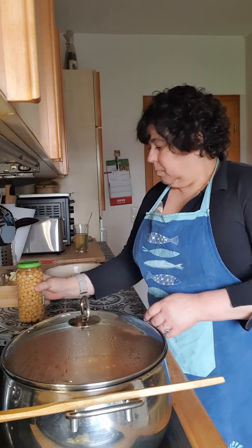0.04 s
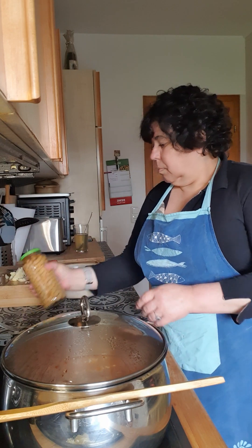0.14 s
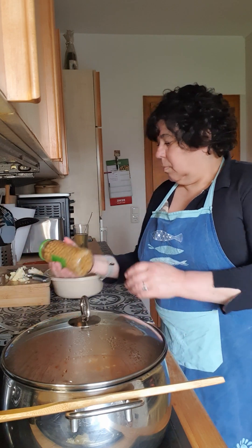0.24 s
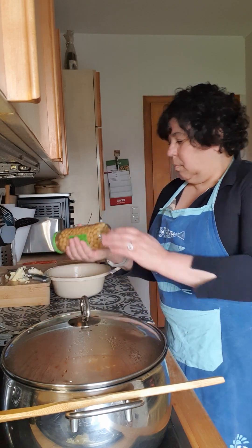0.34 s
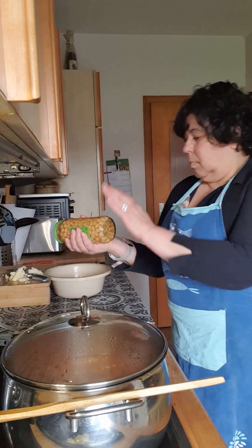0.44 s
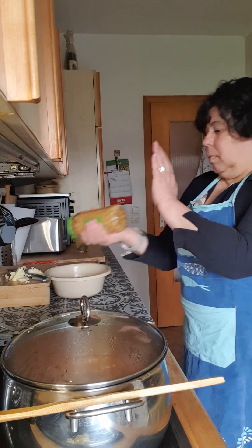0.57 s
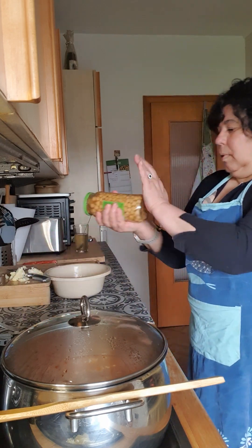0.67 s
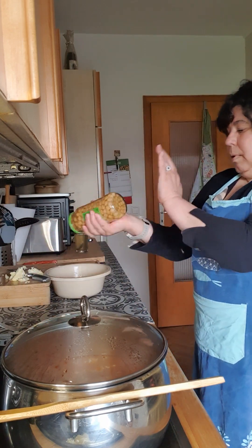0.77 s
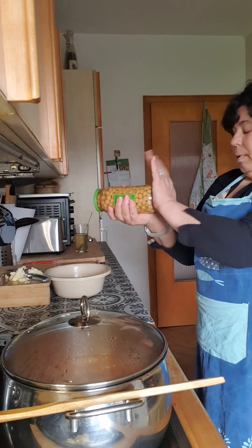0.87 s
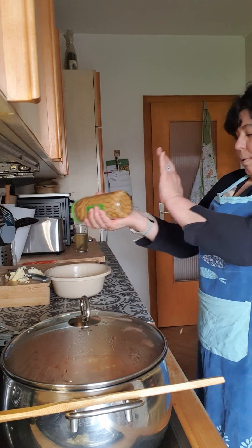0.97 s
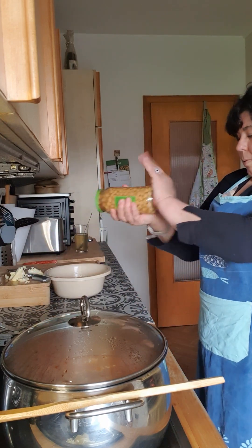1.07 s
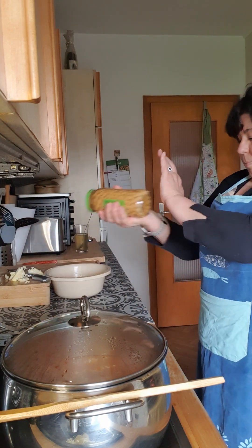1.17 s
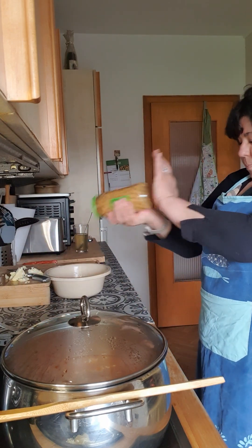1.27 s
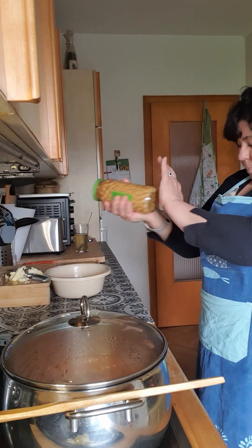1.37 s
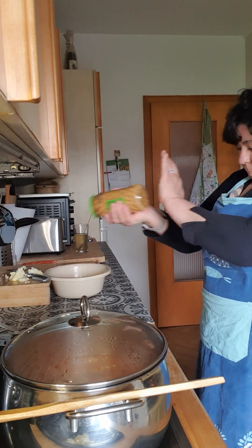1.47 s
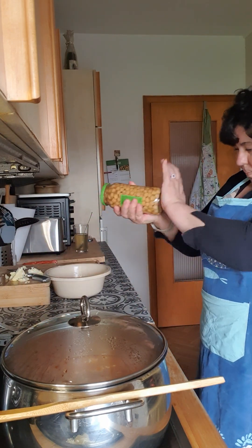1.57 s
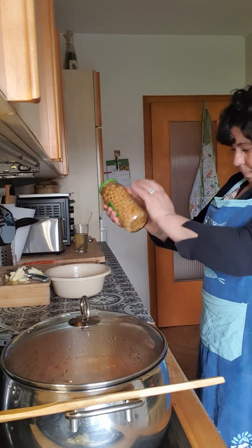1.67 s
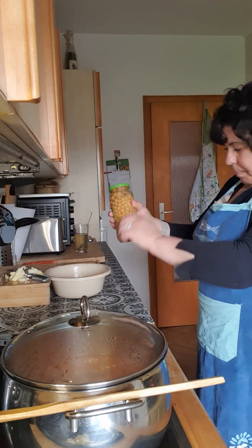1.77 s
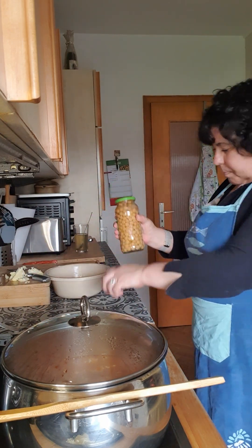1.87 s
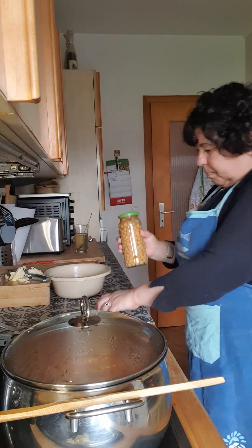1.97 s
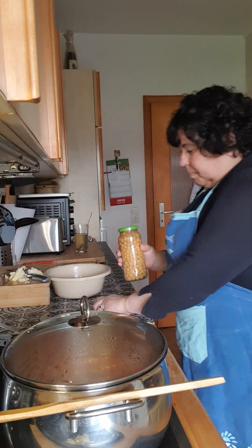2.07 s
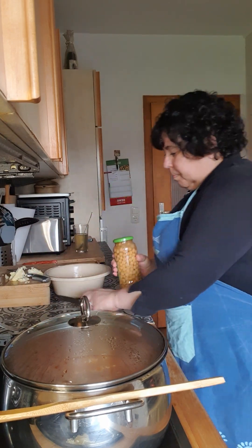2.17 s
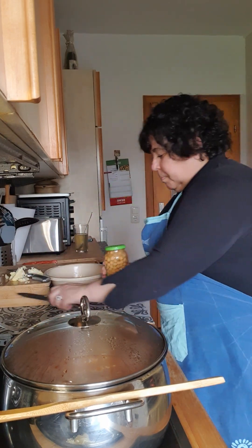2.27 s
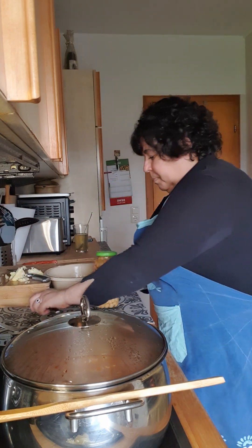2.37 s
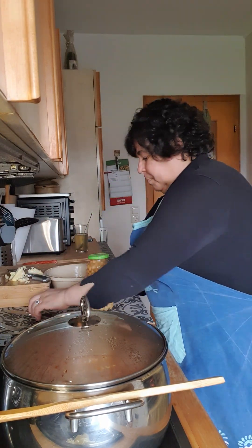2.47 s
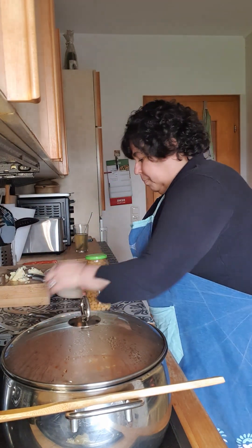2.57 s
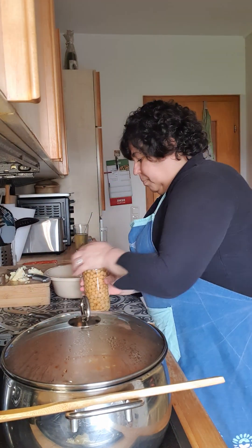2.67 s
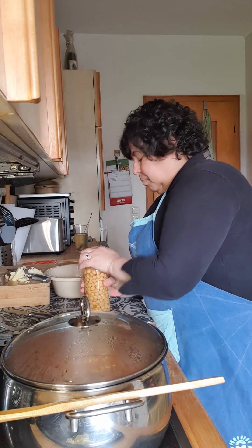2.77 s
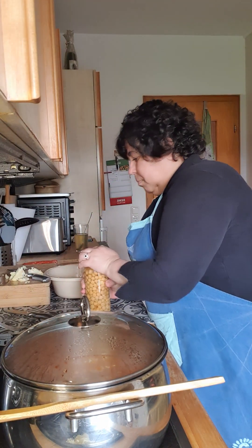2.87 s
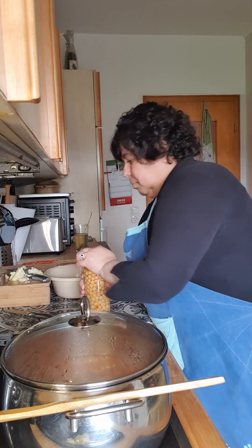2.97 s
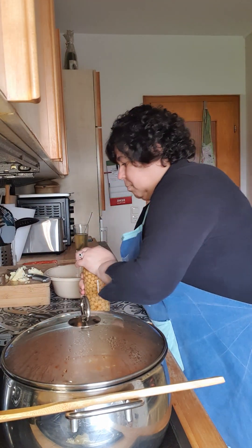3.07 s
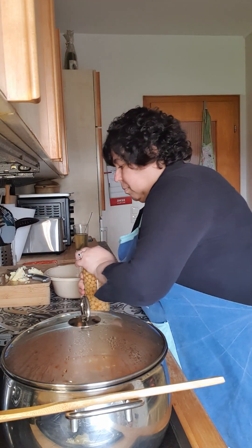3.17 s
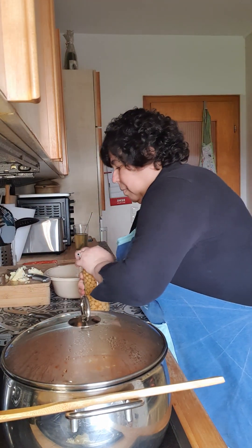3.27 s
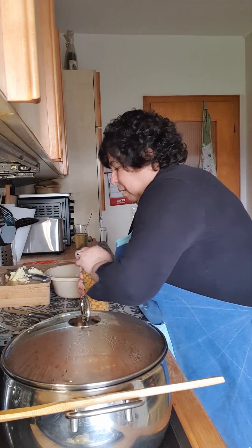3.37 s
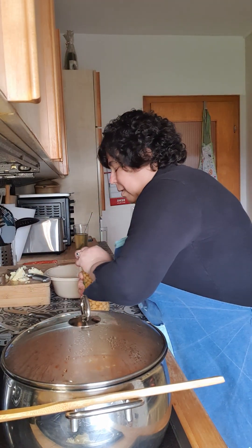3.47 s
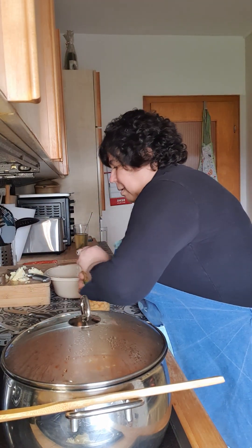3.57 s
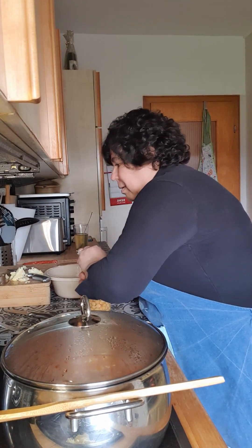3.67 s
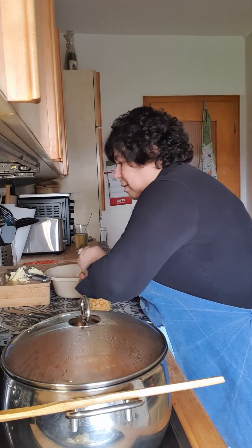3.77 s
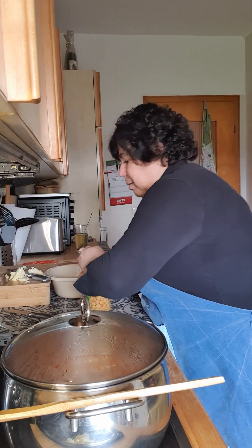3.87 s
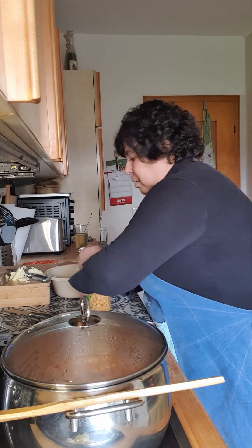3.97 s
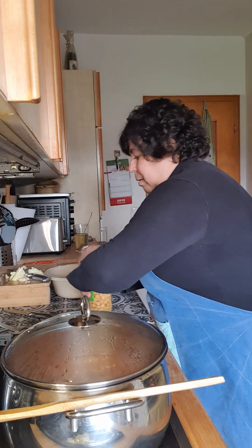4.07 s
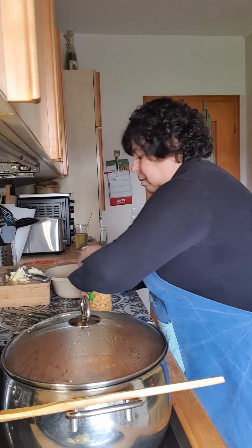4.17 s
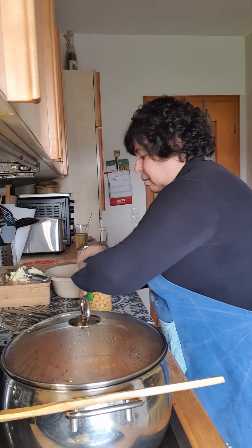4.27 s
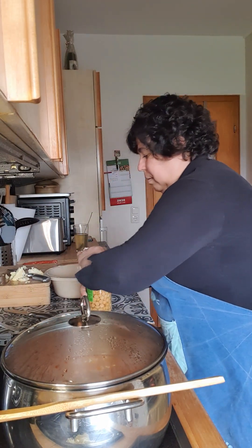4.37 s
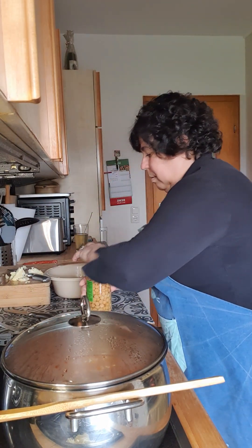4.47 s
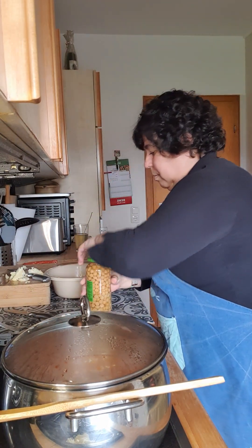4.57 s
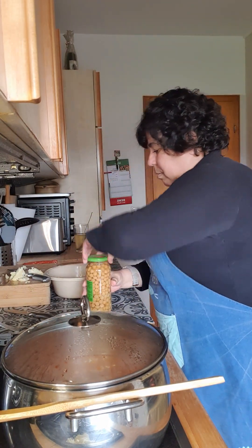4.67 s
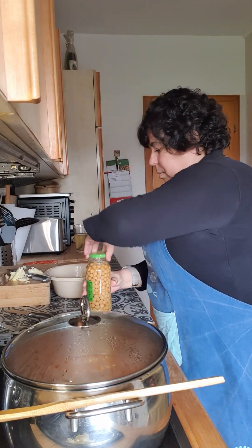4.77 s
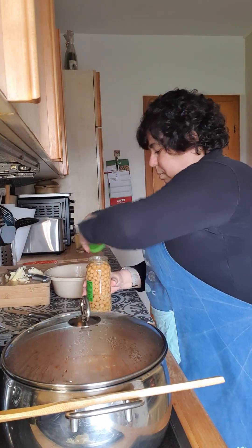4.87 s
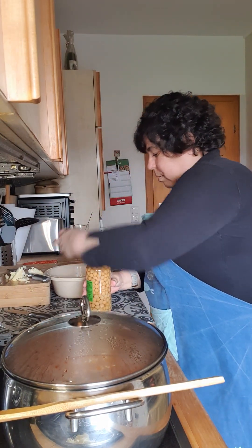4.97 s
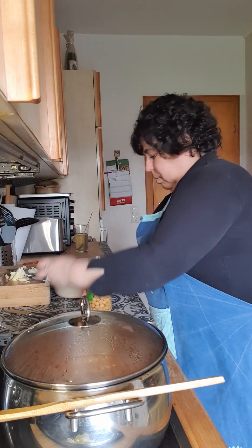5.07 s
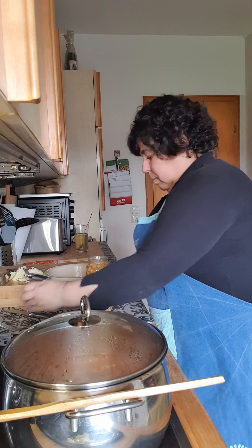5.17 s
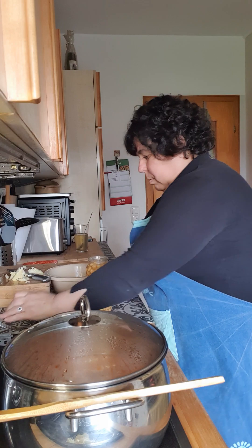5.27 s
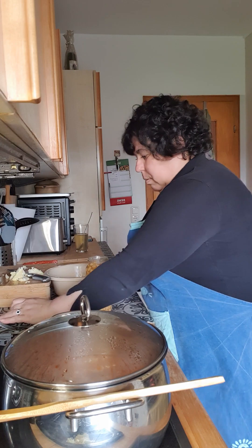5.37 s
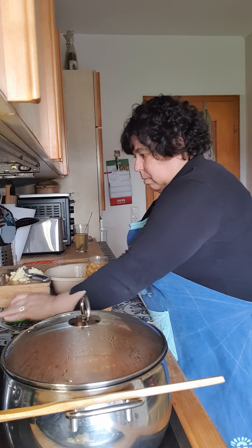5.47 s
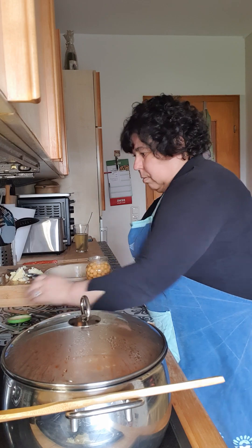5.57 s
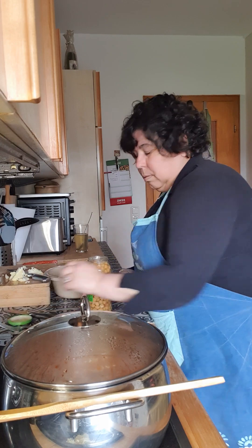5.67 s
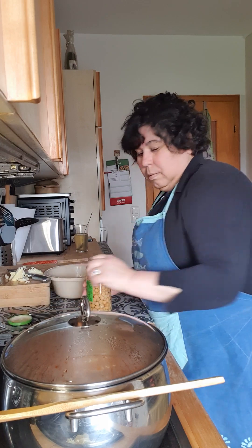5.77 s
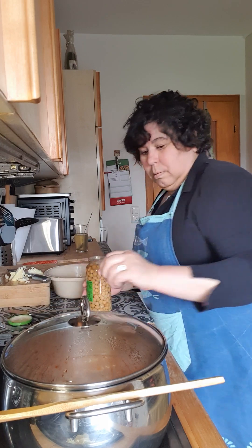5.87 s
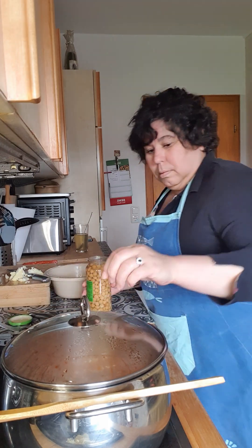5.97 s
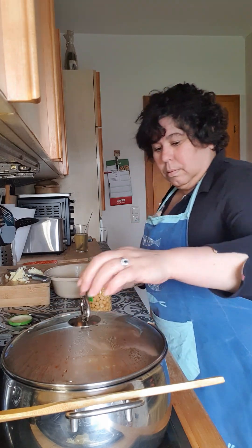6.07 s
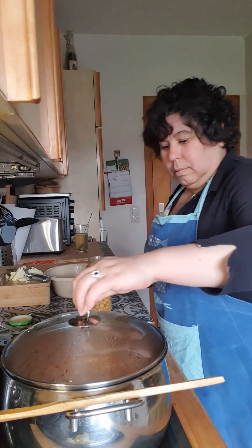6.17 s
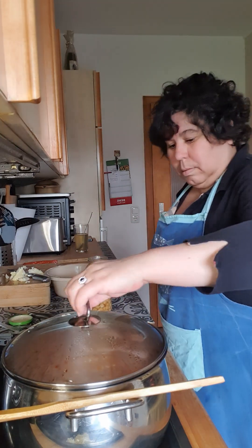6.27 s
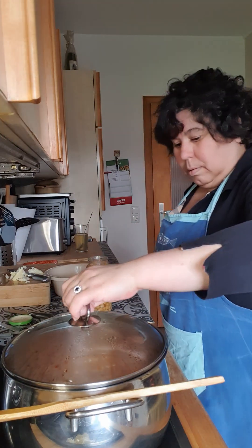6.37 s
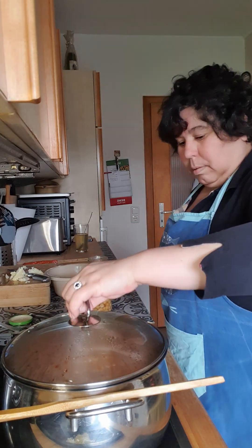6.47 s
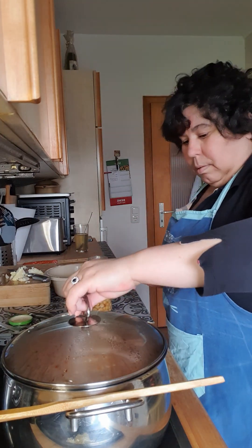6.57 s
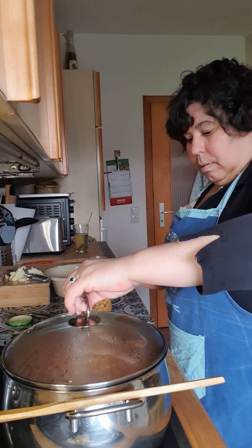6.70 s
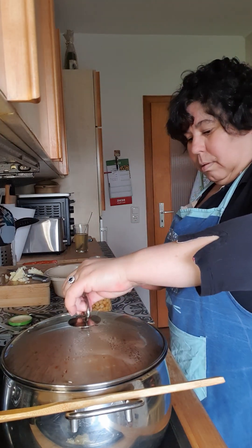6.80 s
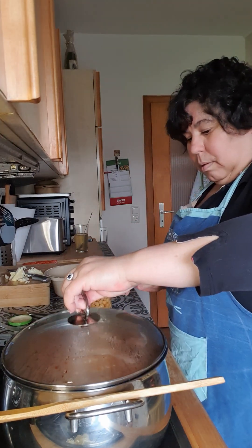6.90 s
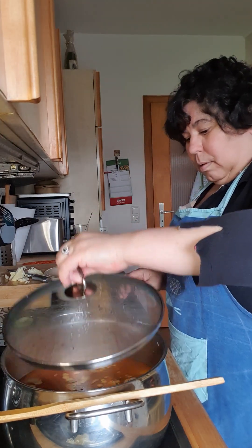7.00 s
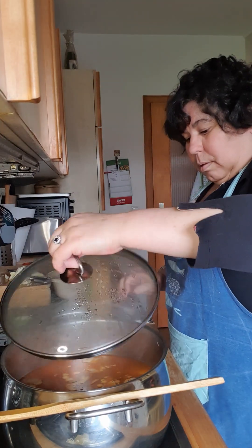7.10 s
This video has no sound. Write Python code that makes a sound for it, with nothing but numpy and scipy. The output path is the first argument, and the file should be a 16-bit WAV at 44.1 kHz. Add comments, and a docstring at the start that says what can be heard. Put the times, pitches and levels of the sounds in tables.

```python
"""A full glass jar is opened in a small, lively kitchen. A palm slaps its base five times; a knife slides
off the counter and the jar is set down. The blade clinks and scratches under the metal lid until the vacuum
pops; the lid clicks free and is laid aside with the knife. Last, a big steel pot's glass lid is lifted.
Hits are coloured pulses plus ringing partials, rubs are showers of tiny slips; both excite the room.
Underneath lie room air and the rustle and bump of the cook's moves."""
import sys
import numpy as np
from scipy import signal
from scipy.fft import rfft, irfft, next_fast_len
from scipy.io import wavfile

SR = 44100
rng = np.random.default_rng(int(sys.argv[2]) if len(sys.argv) > 2 else 0)


def wav_record(signal):
    """Record a signal, one row per channel, as 16-bit PCM in the file named by sys.argv[1]."""
    frames = np.transpose(np.atleast_2d(signal))
    bounded = np.clip(frames, -1, 1)
    # unit amplitude maps onto the largest positive 16-bit level
    quanta = np.round(bounded * 32767).astype(np.int16)
    wavfile.write(sys.argv[1], SR, quanta)


N = 314829
SIZE = 24576   # samples in one hit with its tail
AGE = np.arange(SIZE) / SR
HZ = np.maximum(np.fft.rfftfreq(SIZE, 1 / SR), 1)
PAN = np.array([[.5], [-.5]])   # splits a left-minus-right level between the channels


def from_db(db):
    """Decibels to gain."""
    return np.exp(np.asarray(db) * (np.log(10) / 20))


def unit_energy(x):
    """Scale to a mean energy of one per channel."""
    return x / np.sqrt(np.mean(np.sum(x ** 2, axis=-1)) + 1e-30)


def at_hz(points, hz):
    """Read a table on a log-frequency axis."""
    point_hz, values = np.transpose(points)
    return np.interp(np.log(hz), np.log(point_hz), values)


def colour_db(points, hz):
    """An EQ curve that rolls off 18 dB per octave below its first point."""
    return at_hz(points, hz) - 18 * np.maximum(np.log2(points[0][0] / hz), 0)


def bell(hz, octaves):
    """An EQ bell of height one."""
    return np.exp(-(np.log2(HZ / hz) / octaves) ** 2)


def drift(rate, size):
    """A random wander of spread about one."""
    knots = rng.standard_normal(4096)
    return np.interp(np.arange(size) / SR * rate, np.arange(len(knots)), knots)


def swell(s, db, rise_s, fall_s, shape=1.5):
    """Envelope of a gesture peaking at s; shape 1 is pointed, 2 rounded."""
    t = np.arange(N) / SR - s
    away = np.minimum(np.maximum(-t / rise_s, t / fall_s), 10)
    return from_db(db) * np.exp(-away ** shape)


def impact(gain_db):
    """The tightest causal pulse with this spectrum."""
    cepstrum = irfft(np.log(from_db(gain_db)))
    cepstrum[1:SIZE // 2] *= 2
    cepstrum[SIZE // 2 + 1:] = 0
    return irfft(np.exp(rfft(cepstrum)))


def ringing(modes, attack_s=0.0027):
    """Decaying partials; the higher ones reach the two ears out of step."""
    hz, db, t60 = np.transpose(modes)[:, :, None]
    phase = rng.normal(0, 1, (2, len(modes), 1)) * np.minimum(hz / 1000, 2)
    partials = from_db(db - 60 * AGE / t60) * np.sin(2 * np.pi * hz * AGE + phase)
    return unit_energy(partials.sum(axis=1) * (1 - np.exp(-AGE / attack_s)))


def add(out, s, sound, db, pan_db):
    """Place a unit-energy sound; db is its level if spread over 50 ms."""
    start = round(s * SR)
    gain = from_db(db + PAN * pan_db) * np.sqrt(SR / 20)
    out[:, start:start + SIZE] += gain * sound[:, :N - start]


# stereo image of the room: (frequency [Hz], left-right correlation [-1 to 1])
ROOM_CORRELATION = [(50, 1), (150, 0.95), (300, 0.62), (600, 0.55), (1200, -.1), (2500, -0.11), (12000, 0)]
def diffuse(size):
    """Spectrum of noise from all sides: centred in the bass, wide on top."""
    hz = np.maximum(np.fft.rfftfreq(size, 1 / SR), 1)
    mid, side = rfft(rng.standard_normal((2, size)))
    alike = at_hz(ROOM_CORRELATION, hz)
    return hz, np.sqrt(1 + alike) * mid + np.sqrt(1 - alike) * side * [[1], [-1]]


def noise(colour):
    """Steady coloured stereo noise, rms one."""
    hz, field = diffuse(next_fast_len(N + 1, True))
    return unit_energy(irfft(field * from_db(colour_db(colour, hz)))[:, :N]) * np.sqrt(N)


# room air: (frequency [Hz], level [dB])
AIR_EQ = [(12, -38.5), (20, -11.5), (77, -8), (146, 2), (234, -10), (388, -17), (558, -18), (1090, -22.5),
          (1810, -26.5), (2020, -31), (4940, -34.5), (5380, -40), (7310, -48), (11800, -40.5),
          (16000, -45.5)]
def room_tone(air_db=-68.5, whine_hz=5480, whine_db=-96.0):
    """A dark bed of air with a faint, wavering whine."""
    whine = np.sin(2 * np.pi * np.cumsum(whine_hz + 30 * drift(150, N)) / SR)
    return from_db(air_db) * noise(AIR_EQ) + from_db(whine_db) * whine


# reaches, leans and steps: (peak time [s], half length [s], rustle [dB], bump [dB])
MOVES = [(0.12, 0.15, -65, -56), (0.53, 0.19, -64.5, -67), (1.35, 0.4, -62, -61),
         (1.916, 0.087, -65.5, -54), (2.293, 0.14, -45.5, -43.5), (2.959, 0.21, -58.5, -52),
         (3.543, 0.21, -62, -53), (3.693, 0.052, -67, -40), (4.371, 0.14, -59.5, -52),
         (4.822, 0.1, -70, -67), (5.737, 0.12, -74.5, -56.5), (6.4, 0.46, -74, -68),
         (6.94, 0.037, -76.5, -40), (7.096, 0.095, -74, -34.5)]
# sleeves and apron: (frequency [Hz], level [dB])
CLOTH_EQ = [(290, -30.5), (500, -1.5), (843, -6), (988, -6), (1980, -4), (2540, -10.5), (3340, -5),
            (7310, -19.5), (11300, -20.5), (16000, -32)]
# floor bumps: (frequency [Hz], level [dB])
FLOOR_EQ = [(15, -54), (25, -15), (102, 4.5), (196, -6.5), (253, -11), (387, -12), (430, -20), (472, -20.5),
            (577, -20.5), (600, -15.5), (780, -38.5), (1320, -120)]
def cook_moves(cloth_trim_db=-4.0, bump_trim_db=-3.5):
    """Each move rustles the clothes and bumps the floor."""
    rustling = sum(swell(s, db, half_s, half_s) for s, half_s, db, _ in MOVES)
    bumping = sum(swell(s, db, half_s, half_s) for s, half_s, _, db in MOVES)
    cloth = from_db(cloth_trim_db + 0.64 * drift(60, N)) * rustling * noise(CLOTH_EQ)
    return cloth + from_db(bump_trim_db) * bumping * noise(FLOOR_EQ)


# reverb decay in overlapping bands: (frequency [Hz], t60 [s])
REVERB_DECAY = [(80, .5), (250, 0.3), (700, 0.39), (1500, 0.37), (3500, 0.33), (7000, 0.3), (14000, 0.25)]
BAND_HZ, BAND_T60 = np.transpose(REVERB_DECAY)
BAND_SHARE = np.float32([np.interp(np.log(HZ), np.log(BAND_HZ), one) for one in np.eye(len(BAND_HZ))])
BAND_FADE = np.float32(from_db(-60 * AGE / BAND_T60[:, None]))
# standing waves: (frequency [Hz], level [dB], t60 [s])
ROOM_MODES = [(88.4, -3.5, 0.15), (106.3, 3, 0.46), (146.4, 4.5, 0.45), (231.3, -1, 0.56),
              (368, -8.5, 0.32), (488, -5, .35), (592, -8, 0.17)]
def kitchen(direct_db, build_s=0.0045, cupboard_s=.022, counter_s=0.0061, waves_db=-21.5):
    """Response from one spot: direct sound, early scatter, a tail dying by band, standing waves."""
    _, field = diffuse(SIZE)
    field *= from_db(-3.5 * bell(110, 1))   # leave space for the standing waves
    tail = np.sum(irfft(field.astype(np.complex64) * BAND_SHARE[:, None]) * BAND_FADE[:, None], axis=0)
    # the near cupboards answer first, the far walls join a little later
    bloom = (1 - np.exp(-AGE / build_s)) * from_db(-4 * np.exp(-(AGE / cupboard_s) ** 2))
    grain = from_db(3 * drift(1500, SIZE) * np.exp(-AGE / cupboard_s))
    tail = unit_energy(tail * bloom * grain)
    # counter and splashback smear the direct sound
    near = from_db(5) * unit_energy(irfft(field) * np.exp(-np.minimum(AGE / counter_s, 20)))
    near[0, 2] += 1
    near[1, 0] += 1
    return unit_energy(tail + from_db(waves_db) * ringing(ROOM_MODES) + from_db(direct_db) * unit_energy(near))


def in_room(pulse, direct_db, padded=2 ** 15):
    """Send a pulse through the kitchen."""
    return irfft(rfft(pulse[:padded - SIZE], padded) * rfft(kitchen(direct_db), padded))[:, :SIZE]


def strikes(hits, colour, modes, ring_db, pan_db, body_db, body_width_hz, max_t60=.32):
    """Knocks on one object, each with its own brightness and accent; partials die within max_t60."""
    out = np.zeros((2, N))
    # the body's resonances also colour the knock
    humps = [from_db(db / 4) / (1 + ((HZ - hz) / min(body_width_hz, hz / 12)) ** 2) for hz, db, _ in modes]
    body = colour_db(colour, HZ) + body_db * np.max(humps, axis=0)
    for s, db, tilt, accent_hz, accent_db, direct_db in hits:
        tone = body + tilt * np.log2(np.maximum(HZ, 200)) + accent_db * bell(accent_hz, 0.28)
        ring = ringing([(hz, level + tilt * np.log2(hz), min(t60, max_t60)) for hz, level, t60 in modes])
        knock = in_room(unit_energy(impact(tone)), direct_db)
        add(out, s, knock + from_db(ring_db) * ring, db, pan_db)
    return out


def rub(strokes, colour, slips_per_s, trim_db, pan_db):
    """Tiny uneven slips under each stroke excite the surface and the room."""
    chance = slips_per_s / SR
    slips = (rng.random(N) < chance) * rng.standard_normal(N) / np.sqrt(chance)
    force = slips * sum(swell(*stroke) for stroke in strokes)
    response = in_room(unit_energy(impact(colour_db(colour, HZ))), direct_db=2.5)
    return signal.fftconvolve(force[None], response, axes=1)[:, :N] * from_db(trim_db + PAN * pan_db)


# fingers on the pot's steel handle: (time [s], level [dB], pitch [Hz], relative width [-])
HANDLE_TOUCHES = [(6.125, -57.5, 3054, 1), (6.1250, -64, 2800, .1), (6.314, -63.5, 3870, 0.13),
                  (6.3137, -77, 1897, .05), (6.3532, -70.5, 3950, 0.13), (6.533, -61, 149, 0.55)]
def pot_handle():
    """Damped ticks and a soft bump as the hand takes hold."""
    out = np.zeros((2, N))
    for s, db, hz, width in HANDLE_TOUCHES:
        tone = 32 * bell(hz, 2 * width) - 3 * np.maximum(np.log2(HZ / hz), 0)
        add(out, s, in_room(unit_energy(impact(tone)), direct_db=-1), db, pan_db=1.5)
    return out


# lid on pot: (time [s], level [dB], tilt [dB/octave], accent [Hz], accent [dB], direct [dB])
POT_HITS = [(6.911, -51.5, -1.5, 1100, 13, -8), (6.9295, -42.5, -4.5, 720, 22, 9),
            (7.009, -33.5, -13.5, 108, -8, -4), (7.0208, -36, 3.5, 3000, 9.5, -1),
            (7.029, -42, 3.5, 3000, -13, -7)]
# the pot's clunk: (frequency [Hz], level [dB])
POT_EQ = [(29, -40), (50, -5.5), (103, 2.5), (321, -17.5), (353, -26.5), (418, -21), (450, -3), (615, -14),
          (997, -11), (1580, -26), (1960, -23), (2680, -26), (5400, -42.5), (8970, -68), (16000, -67.5)]
# its ring: (frequency [Hz], level [dB], t60 [s] limited to max_t60)
POT_RING = [(104.7, 2.5, 0.41), (364, -6, 0.6), (456, -0.5, 0.38), (554, -27.5, .5), (935, -17, 0.41),
            (1440, -23, 0.27), (1740, -14, .5), (2040, -20, .17), (2700, -12.5, 0.15), (3360, -15, 0.092),
            (3640, -15, 0.1), (4900, -29, 0.14)]
# lid grazing the rim: (peak time [s], level [dB], rise [s], fall [s])
RIM_STROKES = [(6.93, -54, 0.021, 0.021), (7.005, -37, 0.019, 0.0097)]
# rim scrape: (frequency [Hz], level [dB])
RIM_EQ = [(240, -23), (400, 0), (1180, -7), (1400, -19), (1560, 3), (1900, -13), (3870, -8.5), (5430, -18),
          (8900, -17), (16000, -29)]
def pot_lid():
    """The glass lid knocks and scrapes on the steel rim as it lifts."""
    knocks = strikes(POT_HITS, POT_EQ, POT_RING, ring_db=-0.5, pan_db=-0.5, body_db=2, body_width_hz=50)
    return knocks + rub(RIM_STROKES, RIM_EQ, slips_per_s=3700, trim_db=-0.5, pan_db=0.5)


# small knocks: (time [s], level [dB], tilt [dB/octave], accent [Hz], accent [dB], direct [dB])
TAP_HITS = [(0.155, -59, 0, 4200, 4, 0), (0.24, -72, 7.5, 9960, 9, -3), (2.0613, -76, 0, 3520, 10, -3),
            (2.079, -64, -2, 4200, 9, 4), (2.1062, -58, -0.5, 3460, 5, -1),
            (2.2345, -48.5, -1, 1600, 9, 11.5), (5.4108, -47.5, -1.5, 857, 4, -5.5),
            (5.5388, -48.5, 1.5, 5350, 8, -2), (5.6365, -48, 5, 3530, 1, 2.5),
            (5.7106, -52.5, 4, 5970, 4.5, 1.5), (5.7659, -56.5, 3.5, 9150, 10, 5),
            (5.8054, -56, 5, 3990, -3, -1.5), (5.8308, -60, 2, 6000, -3, 7)]
# the lightly tapped counter: (frequency [Hz], level [dB])
TAP_EQ = [(71, -21), (120, -1), (289, -5), (370, -3), (698, -6), (856, -10), (930, -8), (1520, -16.5),
          (2700, -10), (3820, -10), (4780, -17), (9210, -25.5), (13900, -36), (16000, -47)]
# its ring: (frequency [Hz], level [dB], t60 [s] limited to max_t60)
TAP_RING = [(366, -7, 0.61), (646, -16, .25), (866, 4.5, 0.27), (2670, -2, 0.13), (3400, -20, .16)]
# jar lid pushed aside: (peak time [s], level [dB], rise [s], fall [s])
LID_STROKES = [(5.76, -54.5, 0.18, 0.1)]
def counter_clatter():
    """Jar, knife and lid tap the counter; the lid slides to rest."""
    taps = strikes(TAP_HITS, TAP_EQ, TAP_RING, ring_db=-8.5, pan_db=1, body_db=7.5, body_width_hz=43)
    return taps + rub(LID_STROKES, TAP_EQ, slips_per_s=570, trim_db=-1.5, pan_db=0.5)


# knife dragged over the counter: (peak time [s], level [dB], rise [s], fall [s])
KNIFE_STROKES = [(2.24, -38.5, 0.052, 0.11)]
# its swish: (frequency [Hz], level [dB])
KNIFE_EQ = [(120, -31.5), (200, -1), (322, -24.5), (394, -1), (432, -6.5), (473, -3.5), (623, -8.5),
            (1100, -16), (5940, -13.5), (8270, -23), (13600, -19), (16000, -30)]
# the free blade: (frequency [Hz], level [dB], t60 [s])
KNIFE_RING = [(5220, 0.5, 0.66), (6320, -7, 0.51), (6318, -12, .55), (6971, -19.5, .4), (7800, -13, 0.21),
              (8270, -11, 0.21), (9000, -6, 0.44), (9400, -12, .5), (10200, -17, .3), (11500, -17, .25),
              (12543, -6, 0.33), (13000, -15, .35), (13867, -9.5, .35)]
def knife_pickup(jolt_s=2.5185):
    """The knife slides, is jolted as it leaves the counter and sings on."""
    out = rub(KNIFE_STROKES, KNIFE_EQ, slips_per_s=5400, trim_db=-1, pan_db=2)
    add(out, jolt_s, ringing(KNIFE_RING), db=-41, pan_db=-1)
    return out


# jar landing: (time [s], level [dB], tilt [dB/octave], accent [Hz], accent [dB], direct [dB])
JAR_HITS = [(2.5092, -33, 2.5, 3350, 9, -2), (2.5185, -32, -0.5, 13000, 6, -10),
            (2.5437, -32.5, -0.5, 3430, 2, -1), (2.590, -36.5, -4, 400, 3.5, -10),
            (2.649, -46.5, 3.5, 3820, -5, -1.5)]
# the counter's thunk: (frequency [Hz], level [dB])
THUNK_EQ = [(29, -32.5), (50, -20.5), (141, -0.5), (203, -7.5), (450, -5.5), (615, -4.5), (765, -12),
            (927, -8.5), (1330, -23.5), (3670, -16.5), (4900, -26.5), (5400, -26.5), (7390, -34),
            (9410, -35), (16000, -43)]
# jar on counter: (frequency [Hz], level [dB], t60 [s] limited to max_t60)
JAR_RING = [(41.7, -18, 0.62), (145.4, -2, 0.55), (364, -1, 0.62), (546, 1, 0.15), (597.6, 5.5, 0.15),
            (2920, -23, .24), (3290, -20.5, .12)]
def jar_set_down():
    """The full jar settles in a quick run of knocks."""
    return strikes(JAR_HITS, THUNK_EQ, JAR_RING, ring_db=-2.5, pan_db=1, body_db=-2.5, body_width_hz=43)


# blade on lid: (time [s], level [dB], tilt [dB/octave], accent [Hz], accent [dB], direct [dB])
BLADE_HITS = [(2.8040, -37, 2, 2390, 1, -4), (2.9180, -47.5, 4, 3670, 22.5, 4.5),
              (3.3524, -65.5, 2, 4000, 20, -4), (3.533, -61.5, -6.5, 3000, 5, 6.5),
              (3.6068, -68, 1, 3970, -2, 9.5), (3.6437, -56.5, -3, 3500, 0.5, 2.5),
              (3.7709, -63, -2, 3770, 27, 3.5)]
# the clink: (frequency [Hz], level [dB])
BLADE_EQ = [(530, -39), (900, -12), (1550, -16), (1900, -13.5), (2040, -11.5), (2270, -4.5), (3190, -15),
            (3550, -24.5), (4920, -11), (5610, -16), (6330, -9), (10400, -22.5), (13200, -20.5),
            (14900, -35), (16000, -48.5)]
# its ring: (frequency [Hz], level [dB], t60 [s] limited to max_t60)
BLADE_RING = [(2200, -8, .3), (2430, -2, .29), (3122, -5.5, .35), (5050, 4.5, 0.35), (5222, -8, .35),
              (6200, -1.5, .25), (7014, -17, 0.12), (11900, -2, 0.11)]
# blade working under the lid: (peak time [s], level [dB], rise [s], fall [s])
PRY_STROKES = [(3.32, -69, .05, .04), (3.368, -62, 0.02, .04), (3.45, -54.5, .03, .04),
               (3.536, -53.5, .015, .045), (3.61, -56.5, 0.028, .02), (3.648, -49, 0.0082, 0.045)]
# the scratch: (frequency [Hz], level [dB])
PRY_EQ = [(180, -36), (300, -10.5), (372, -8), (425, -10), (645, -5), (787, -10), (1690, -21), (2480, -8.5),
          (2740, -14.5), (3290, -10.5), (9710, -25), (16000, -53.5)]
def blade_prying():
    """The blade clinks on the lid's rim and scratches beneath it."""
    out = strikes(BLADE_HITS, BLADE_EQ, BLADE_RING, ring_db=-8.5, pan_db=1.5, body_db=6.5, body_width_hz=94)
    return out + rub(PRY_STROKES, PRY_EQ, slips_per_s=400, trim_db=-1.5, pan_db=1.5)


# lid on thread: (time [s], level [dB], tilt [dB/octave], accent [Hz], accent [dB], direct [dB])
LID_HITS = [(4.000, -55.5, -10.5, 2550, 10.5, -9), (4.4115, -50, -1, 5820, 14.5, 0),
            (4.6965, -39, 4, 3390, 2, -5.5), (4.702, -43.5, 0, 3400, 2.5, -14)]
# the click: (frequency [Hz], level [dB])
LID_EQ = [(150, -49.5), (250, -25), (360, -10.5), (557, -12), (845, -8.5), (1060, -12), (1380, -4),
          (2280, -9), (2910, -14), (3650, -4), (5630, -26.5), (7980, -23.5), (8850, -26), (11100, -19),
          (16000, -33.5)]
# its tinny ring: (frequency [Hz], level [dB], t60 [s] limited to max_t60)
LID_RING = [(1173, -2.5, 0.59), (1310, -0.5, 0.27), (2058, -9.5, 0.18), (2250, -5, .22), (3140, 1, .22),
            (3490, -6.5, 0.35), (3640, -2, 0.13), (4160, -6, .26), (6634, -13.5, 0.43), (7863, -13, 0.14),
            (11200, -12.5, .19)]
def screw_lid():
    """The metal lid clicks on the glass thread."""
    return strikes(LID_HITS, LID_EQ, LID_RING, ring_db=-6, pan_db=1, body_db=5, body_width_hz=65)


# palm on jar: (time [s], level [dB], thud [dB], hand hollow [Hz], hollow [dB], crack [dB],
# dry snap [dB], ring [dB])
PALM_HITS = [(0.7089, -20.5, -9, 4260, 4.5, 8, -6, -44), (0.9346, -25.5, 5, 3480, 7.5, 6.5, -28, -45.5),
             (1.162, -27, 0.5, 1840, 2.5, 1.5, -7.5, -44.5), (1.3749, -41, 16.5, 386, 3, 6.5, -37, -47),
             (1.5886, -34.5, 8.5, 1176, 6.5, 12, -22, -47)]
# the smack: (frequency [Hz], level [dB])
PALM_EQ = [(29, -50), (50, -11.5), (145, -6.5), (184, -11.5), (229, -9), (258, -15), (371, -8.5),
           (450, -18), (545, -10.5), (1210, -6), (1400, -3.5), (3670, -2.5), (6870, -8), (12000, -14),
           (16000, -18)]
# the jar under the palm: (frequency [Hz], level [dB], t60 [s])
PALM_RING = [(147.4, -2.5, 0.3), (1390, -9.5, .25), (3268, -1, 0.31), (4540, -13, 0.2)]
def palm_slaps(direct_db=-8.5, pan_db=0.5, snap_hz=4900, snap_t60=0.0052, snap_trim_db=-29, graze_s=0.0022):
    """Air squeezed from under the palm cracks, coloured by the hand's hollow; the jar thuds and rings."""
    out, base = np.zeros((2, N)), colour_db(PALM_EQ, HZ)
    scale = np.linalg.norm(impact(base))
    snap = np.sin(2 * np.pi * snap_hz * AGE) * from_db(-60 * AGE / snap_t60)
    for s, db, thud_db, hollow_hz, hollow_db, crack_db, snap_db, ring_db in PALM_HITS:
        hollow = bell(hollow_hz, .45) - 0.5 * bell(1.55 * hollow_hz, 0.36)   # a peak, a notch just above
        tone = base + thud_db * bell(150, 2.6) + hollow_db * hollow + crack_db * bell(12000, 0.57)
        smack = in_room(impact(tone) / scale, direct_db)
        add(out, s - graze_s, smack, db - 26.5, pan_db)   # the edge of the hand lands first
        add(out, s, smack, db, pan_db)
        add(out, s, unit_energy(snap[None]), snap_db + snap_trim_db, pan_db)
        add(out, s, ringing(PALM_RING), ring_db, pan_db)
    return out


# the vacuum lets go: (time [s], level [dB], tilt [dB/octave], accent [Hz], accent [dB], direct [dB])
POP_HIT = [(4.0737, -18, 2, 4340, 1, -3)]
# the pop: (frequency [Hz], level [dB])
POP_EQ = [(45, -18.5), (75, -4.5), (112, 4), (220, -1.5), (450, -13.5), (750, -15), (1060, -5), (1500, -20),
          (2400, -12.5), (4200, -13.5), (5200, -21.5), (5800, -34), (9300, -38), (12000, -48), (15500, -58)]
# its ring: (frequency [Hz], level [dB], t60 [s] limited to max_t60)
POP_RING = [(116.6, 9.5, 0.25), (227.6, 4, 0.48), (284, -4, 0.39), (353.4, -3, .3), (659, -8, 0.36),
            (916, -11, .31), (1063, -6.5, 0.38), (1060, -10.5, .36), (1900, -13.5, 0.2),
            (2310, 0.5, 0.1876), (2470, -2.5, 0.55), (2410, -1, 0.56), (3128, -4.5, .17),
            (3280, -1.5, 0.18), (3880, -2.5, 0.29), (4300, -2, 0.24), (4030, 0, 0.67), (3967, -10, 0.1),
            (4870, -7.5, 0.19), (5023, -7.5, 0.48)]
# the seal giving way: (peak time [s], level [dB], rise [s], fall [s])
SEAL_STROKES = [(4.063, -45, .028, .014)]
# its creak: (frequency [Hz], level [dB])
SEAL_EQ = [(400, -7), (1000, -13), (1380, 2), (1620, -13), (1980, 2), (2250, -12), (2570, -4), (3100, -23),
           (3900, -15.5), (5200, -23.5), (12000, -36.5)]
def vacuum_pop(buzz_hz=3900, buzz_t60=.022, rise_s=0.0021, puff_s=0.0011):
    """The seal creaks and pops; as air rushes in, the lid springs up with a puff and a hard buzz."""
    out = strikes(POP_HIT, POP_EQ, POP_RING, ring_db=-5, pan_db=0.5, body_db=2, body_width_hz=59)
    pop_s = POP_HIT[0][0]
    envelope = from_db(-60 * AGE / buzz_t60) * (1 - np.exp(-AGE / rise_s))
    buzz = envelope * np.sin(2 * np.pi * buzz_hz * AGE)
    swing = AGE / puff_s - 2
    puff = -swing * np.exp(-swing ** 2)
    add(out, pop_s, unit_energy(buzz[None]), db=-28.5, pan_db=7.5)
    add(out, pop_s - puff_s, unit_energy(puff[None]), db=-27, pan_db=1)
    return out + rub(SEAL_STROKES, SEAL_EQ, slips_per_s=950, trim_db=3.5, pan_db=3.5)


def scene():
    """The mix: bed, props and the jar up front."""
    bed = room_tone() + cook_moves()
    props = pot_handle() + pot_lid() + counter_clatter() + knife_pickup()
    jar = jar_set_down() + blade_prying() + screw_lid() + palm_slaps() + vacuum_pop()
    return bed + props + jar


def record(dry, presence_hz=3200, presence_db=4.0, air_hz=10000, air_db=-2.0, cutoff_hz=15900):
    """The left microphone favours presence, the right one air; peaks clip and the top is cut."""
    size = next_fast_len(N + SIZE, True)
    lean_db = presence_db * bell(presence_hz, 1) + air_db * bell(air_hz, 0.93)
    balance = np.interp(np.fft.rfftfreq(size, 1 / SR), HZ, lean_db)
    heard = irfft(rfft(dry, size) * from_db(balance * PAN), size)[:, :N]
    high_cut = signal.ellip(10, .1, 80, cutoff_hz, fs=SR, output="sos")
    return signal.sosfilt(high_cut, np.clip(heard, -1, 1))


dry = scene()
out = record(dry)
wav_record(out)
```